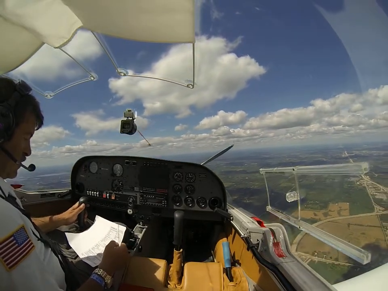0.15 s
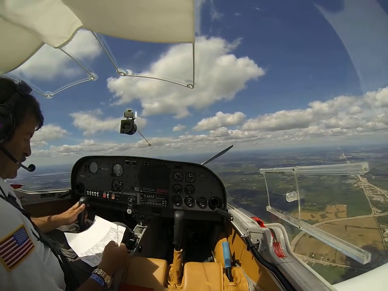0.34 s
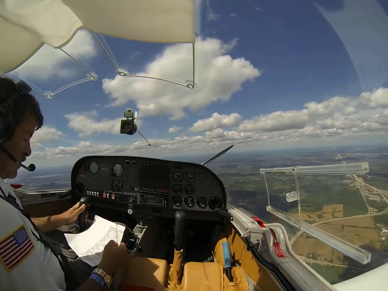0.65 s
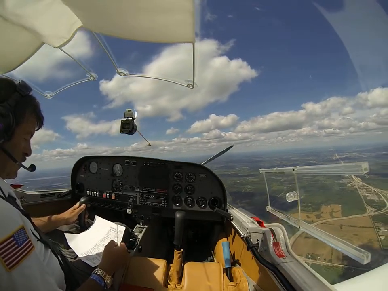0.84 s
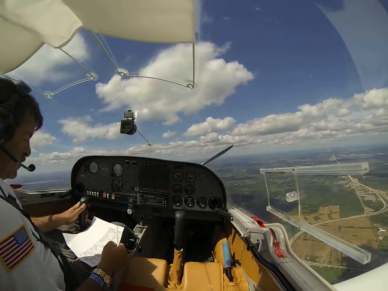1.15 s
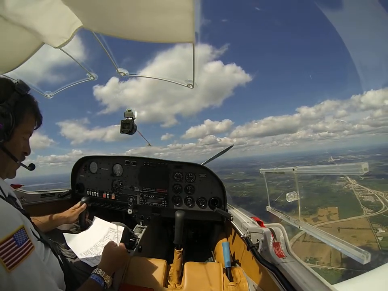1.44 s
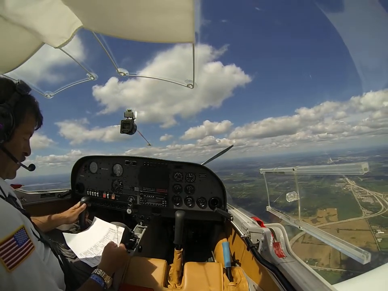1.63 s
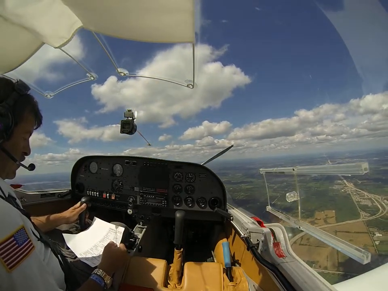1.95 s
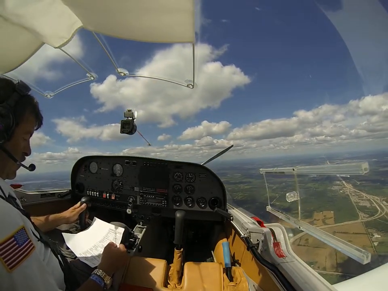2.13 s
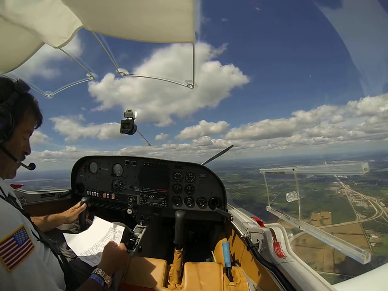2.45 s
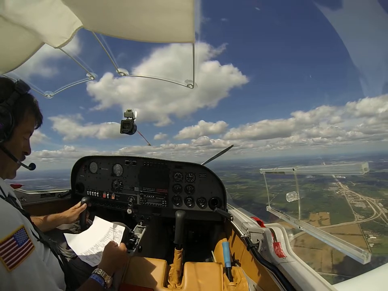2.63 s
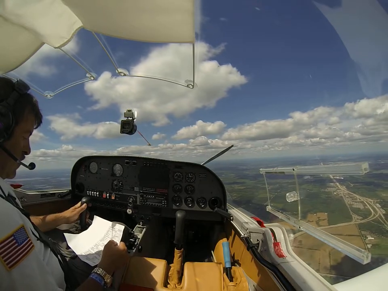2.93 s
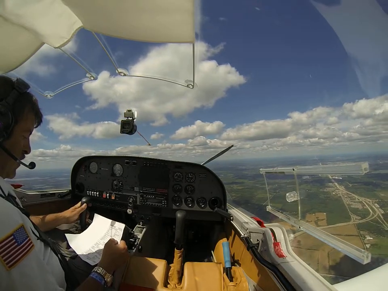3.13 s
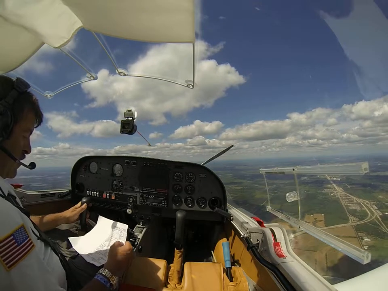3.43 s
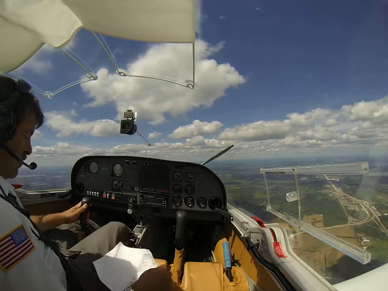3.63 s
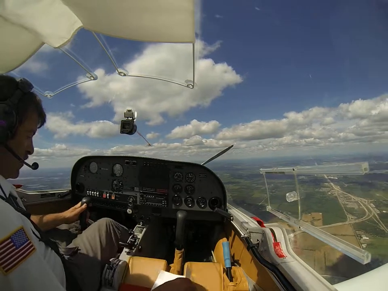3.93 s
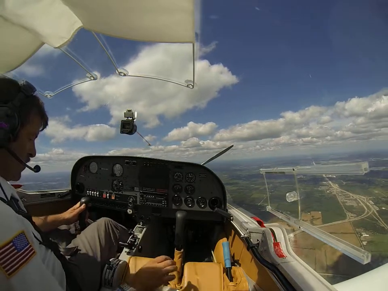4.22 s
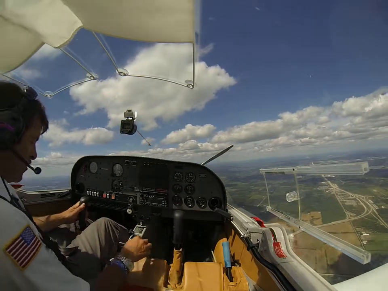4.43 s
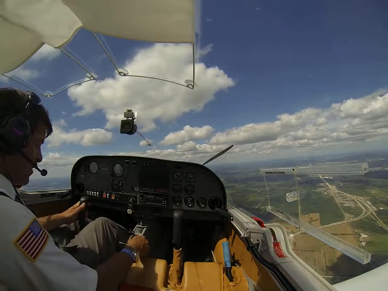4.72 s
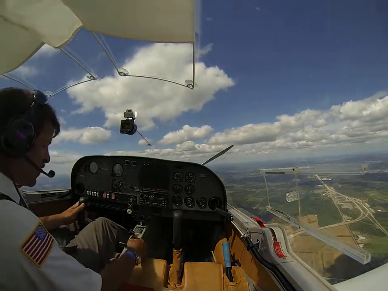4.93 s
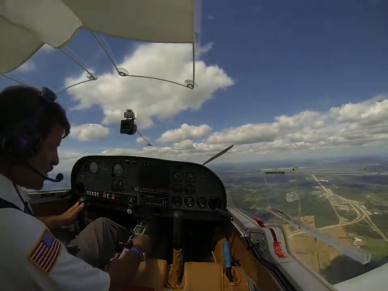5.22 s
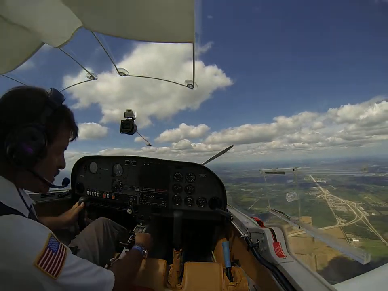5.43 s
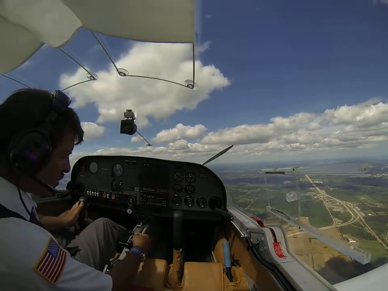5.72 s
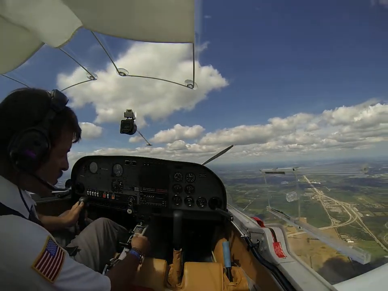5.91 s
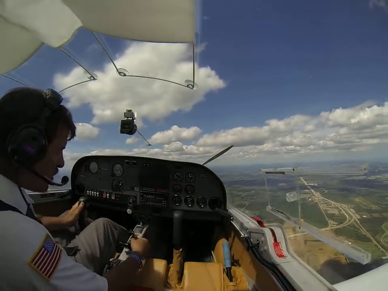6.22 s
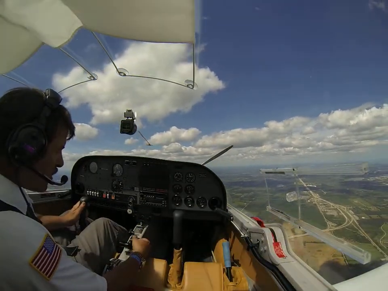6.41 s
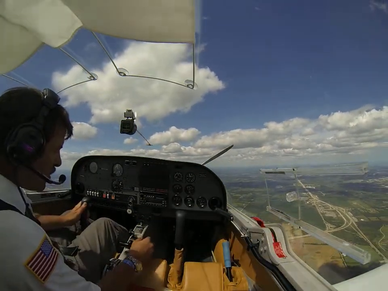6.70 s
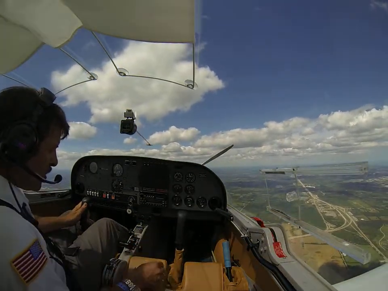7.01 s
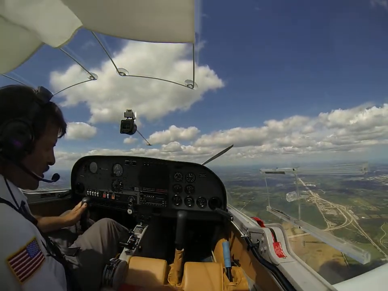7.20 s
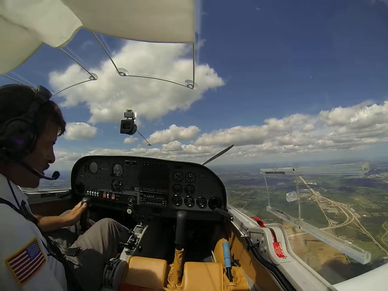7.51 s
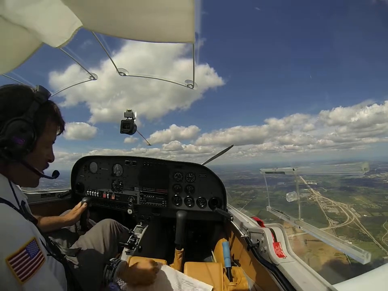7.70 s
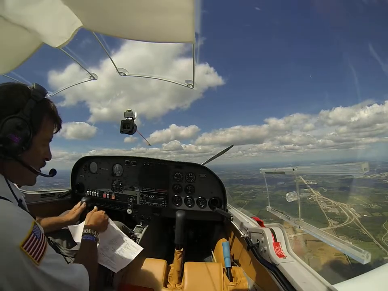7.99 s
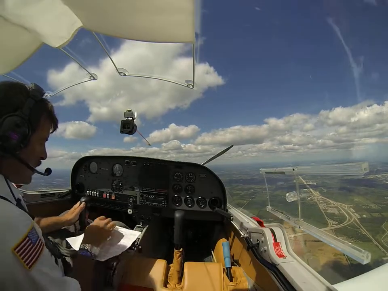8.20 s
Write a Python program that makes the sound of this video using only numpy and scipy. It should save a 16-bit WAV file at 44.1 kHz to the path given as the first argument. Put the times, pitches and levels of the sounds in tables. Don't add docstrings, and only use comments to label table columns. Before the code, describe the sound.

Dense low-frequency wind noise fills a light aircraft's cockpit from start to finish, booming in uneven pulses with a dull panel rumble. Thin air hiss from the seals and a barely-there high whistle lie beneath it. The flow is strongest for the first three seconds, then eases. A sheet of paper is brushed twice after four seconds and three times after seven. Everything is close, enclosed and muffled, with faint rapid electronic ticking from the camera itself.

```python
import sys
import numpy as np
from scipy import signal
from scipy.fft import rfft, irfft, next_fast_len
from scipy.io import wavfile
from scipy.ndimage import uniform_filter1d, map_coordinates

SR = 44100
rng = np.random.default_rng(int(sys.argv[2]) if len(sys.argv) > 2 else 0)


def master_out(mix):
    frames = np.transpose(np.atleast_2d(mix))
    ceiling = np.clip(frames, -1, 1)
    pcm = np.round(ceiling * 32767).astype(np.int16)
    wavfile.write(sys.argv[1], SR, pcm)


def boost_factor(decibels):
    exponent = np.asarray(decibels, float) / 20
    return 10 ** exponent


N = 368235


def shell():
    # centre in Hz, width in Hz, level in dB.
    bending_modes = [(22.2, 7.7, -0.5), (48, 23, -17)]
    hull_modes = [(76.1, 4, 1.5), (86.2, 8, -2)]
    cabin_modes = [(113, 9.7, -9.5), (137.3, 15.7, -2.5), (161.8, 17.2, 0), (183.4, 15, -8.5),
                   (217.4, 14, -10.5), (244.8, 19.3, -16)]
    panel_modes = [(267.8, 17, -4), (304.2, 19, 1.5), (333, 27, -2.5), (372.3, 28.5, -3), (400, 18, -6),
                   (430.6, 25, -8), (463, 31, -13.5), (558, 46, -18.5)]
    # time in seconds, swell in dB.
    throbs = [(.02, 9), (.21, -9), (.5, 8), (.69, 8), (.83, 3), (1.03, 4.5), (1.19, -5), (1.66, -8),
              (2.34, 1), (2.62, 7), (2.72, 8), (3.22, -4), (3.42, 5.5), (3.76, -5), (3.97, 4.5), (4.14, 3),
              (4.36, 9.5), (4.68, -14), (4.96, 5), (5.25, 6.5), (5.42, 3), (5.76, 9), (5.84, -8), (6.25, 8),
              (6.6, 3), (6.93, -10), (7.23, -3), (7.37, 7), (7.64, 6), (8.11, -10)]
    # time in seconds, swell in dB.
    buffets = [(.02, 0.5), (.27, -1.5), (.49, 2.5), (.64, -6), (.73, 1.5), (.91, 5.5), (1.19, -1.5),
               (1.67, 4), (1.85, 2.5), (2.35, 3.5), (2.54, 4), (2.77, -2.5), (2.86, 4), (2.95, -4.5),
               (3.06, 4.5), (3.2, -6), (3.99, -6.5), (4.26, -0.5), (4.67, 4.5), (5.38, 3), (5.46, 3.5),
               (5.61, 5), (6.07, -2), (6.25, 4.5), (6.41, 2), (7.05, 2), (7.52, 0), (7.61, 4.5),
               (7.74, -5.5), (7.94, -4.5)]
    # time in seconds, swell in dB.
    shakes = [(.02, 5), (.15, -3.5), (.78, 2.5), (1.1, 5.5), (1.29, 4), (1.67, 2.5), (1.8, 2), (2.28, 3.5),
              (2.6, 0), (3.06, 2.5), (3.15, -4.5), (3.24, 4), (3.39, 3), (3.66, -3), (5.21, 3),
              (5.42, -5.5), (5.65, 2.5), (5.71, -5), (6.26, -2), (6.7, 4), (7.2, 0), (8.05, 2.5)]
    throb_s, buffet_s = 0.044, 0.033

    sway_db = follows(mean_db=-40, gain_per_db=0.3, unsteady_db=1.4, rate=8)
    hull_db = follows(mean_db=-38, gain_per_db=0.25, unsteady_db=0.92, rate=12) + swells(throbs, throb_s)
    boom_db = follows(mean_db=-28.5, gain_per_db=0.86, unsteady_db=0.68, rate=14) + swells(buffets, buffet_s)
    panel_db = follows(mean_db=-37, gain_per_db=0.51, unsteady_db=0.63, rate=14) + swells(shakes, buffet_s)

    sway = boost_factor(sway_db) * held(noise(ringing(bending_modes, steep=1.38)), span_s=0.25)
    hull = boost_factor(hull_db) * held(noise(ringing(hull_modes, steep=1.35)), span_s=0.091)
    boom = boost_factor(boom_db) * held(noise(ringing(cabin_modes, steep=1.66)), span_s=0.1)
    panels = boost_factor(panel_db) * held(noise(ringing(panel_modes, steep=1.43)), span_s=0.28)
    return sway + hull + boom + panels


def hiss():
    # centre in Hz, width in Hz, level in dB.
    housing_modes = [(806, 160, -14), (943, 65, -5.5), (1325, 225, -9), (1486.5, 87, 0), (1667, 110, -4.5),
                     (1860, 150, -11.5)]
    seal_modes = [(2281, 167, 1.5), (2570, 630, -11.5), (3116, 100, -6), (3174, 540, -9),
                  (3800, 370, -17.5), (4790, 130, -15.5), (5170, 220, -13.5)]
    # frequency in Hz, density in dB per Hz.
    fizz_spectrum = [(3600, -27), (4100, -2), (4500, -5), (6000, 1), (7700, -1.5), (8500, -6), (9550, -6.5),
                     (9750, -9.5)]
    # frequency in Hz, gain in dB.
    capsule_loss = [(9750, 0), (12000, -2), (13400, -4), (14000, -4.5), (14400, -9), (15000, -10),
                    (15300, -40)]

    def fizz_gain(f):
        return boost_factor(along(fizz_spectrum, f) + along(capsule_loss, f)) * (f > fizz_spectrum[0][0])

    gust = wobble(9) + 0.5 * wobble(30)
    housing_db = follows(mean_db=-50.5, gain_per_db=0.24, unsteady_db=0.1, rate=3) + 0.19 * gust
    seal_db = follows(mean_db=-58.5, gain_per_db=0.3, unsteady_db=0.1, rate=3) + 0.15 * gust
    fizz_db = follows(mean_db=-68, gain_per_db=0.25, unsteady_db=0.1, rate=3) + 0.35 * gust

    housing = boost_factor(housing_db) * noise(ringing(housing_modes, steep=1.236), patchy_db=0.8)
    seal = boost_factor(seal_db) * noise(ringing(seal_modes, steep=1.47), patchy_db=0.9)
    fizz = boost_factor(fizz_db) * noise(fizz_gain, patchy_db=1.0)
    return housing + seal + fizz


def whistle():
    # time in seconds, pitch in Hz.
    gap_pitch = [(0, 6800), (.9, 6830), (1.05, 6960), (1.6, 6870), (2.15, 6970), (2.3, 6900), (2.95, 6790),
                 (3.7, 6710), (4.15, 6780), (4.35, 6980), (4.9, 6750), (5.5, 6740), (5.8, 6580),
                 (6.2, 6730), (6.65, 7130), (6.95, 6780), (8, 6770), (8.35, 6640)]
    # time in seconds, swell in dB, half-length in seconds.
    locks = [(.3, 4, .3), (1.1, 9, .2), (1.4, 4, .2), (1.8, 6, .15), (2.12, 9, .1), (2.75, 3, .25),
             (3.5, 4, .12), (4.05, 6, .2), (4.5, 5, .2), (5.25, 6.5, .25), (5.95, 7.5, .12), (6.4, 1, .1),
             (6.66, 8, .1), (7.14, 8, .12), (8.2, 6, .15)]
    # centre in Hz, width in Hz, level in dB.
    slot_modes = [(6600, 60, -6.5), (6790, 60, -3.5), (6960, 50, -3), (7160, 80, -4), (7200, 80, -4),
                  (6900, 900, -10.5)]

    pitch_hz, = curves(gap_pitch)
    phase = 2 * np.pi * np.cumsum(pitch_hz + 40 * wobble(14)) / SR
    breath = [noise(lambda f: 1 / (1 + (f / 200) ** 2)) for _ in range(2)]
    eddies = breath[0] * np.cos(phase) + breath[1] * np.sin(phase)
    level_db = -79 + swells(locks) + 2.1 * wobble(24)
    return boost_factor(level_db) * coloured(eddies, ringing(slot_modes, steep=1.2))


def paper():
    # time in seconds, peak in dB, length in seconds.
    brushes = [
        (4.243, -55, 0.04),
        (4.307, -50, 0.029),
        (7.192, -40, 0.041),
        (7.789, -55, 0.037),
        (7.944, -55, 0.037),
    ]
    # centre in Hz, width in Hz, level in dB.
    sheet_modes = [(2280, 220, 0), (3250, 300, 0)]
    crackle_modes = [(4550, 1500, 0), (6100, 900, -2)]

    t = np.arange(N) / SR
    swell = np.zeros(N)
    snap = np.zeros(N)
    for start_s, peak_db, length_s in brushes:
        u = np.clip(t - start_s + 0.0034, 0, None)
        rise = boost_factor(peak_db - 11) * (1 - np.exp(-u / 0.006))
        swell += rise * np.exp(-(u / max(length_s, 0.005)) ** 4)
        snap += rise * np.exp(-u / 0.028)
    body = swell * boost_factor(1.6 * wobble(230)) * noise(ringing(sheet_modes, steep=1.04))
    crackle = snap * boost_factor(-8 + 4.0 * wobble(280)) * noise(ringing(crackle_modes, steep=1.5))
    return body + crackle


def circuits():
    burst_hz, first_s, tone_hz = 47.9710, 0.0059, 6444
    t = np.arange(N) / SR - first_s
    k = np.floor(t * burst_hz + 0.3).astype(int)
    count = k.max() + 2
    late_cycles = 0.22 * (np.arange(count) % 2) + 0.085 * rng.standard_normal(count)
    u = t - k / burst_hz - late_cycles[k] / tone_hz
    gate = np.clip(np.minimum(u, 0.0082 - u) / 0.0004, 0, 1)
    tone = boost_factor(-69) * np.sin(2 * np.pi * tone_hz * u)
    octave = boost_factor(-74.5) * np.sin(4 * np.pi * tone_hz * u)
    return gate * (tone + octave)


def follows(mean_db, gain_per_db, unsteady_db, rate):
    # time in seconds, strength in dB about its mean.
    airstream = [(0, 3), (.5, 2), (1, 3), (1.5, 1.5), (2.2, 2.5), (2.8, 1.5), (3.2, -2), (3.7, -2),
                 (4.3, 0), (4.8, -1), (5.4, -1.5), (6, -1.5), (6.5, 0), (7, 0), (7.6, 0), (8.35, -.5)]
    return mean_db + gain_per_db * curves(airstream)[0] + unsteady_db * wobble(rate)


def swells(rows, half_s=None):
    t = np.arange(0, N + 64, 64) / SR
    total = np.zeros(len(t))
    for row in rows:
        total += row[1] * np.exp(-((t - row[0]) / max(half_s or row[2], 0.01)) ** 2)
    return np.interp(np.arange(N) / SR, t, total)


def ringing(modes, steep):
    def resonance(f, centre, width):
        return (1 + ((f * f - centre * centre) / (f * width + 1e-9)) ** 2) ** -steep

    def gain(f):
        power = sum(boost_factor(2 * db) * resonance(f, centre, width) for centre, width, db in modes)
        return np.sqrt(power / (1 + (f / 8000) ** 6))

    return gain


def noise(gain, patchy_db=0.):
    z = signal.stft(rng.standard_normal(N + SR), nperseg=512)[2]
    field = uniform_filter1d(rng.standard_normal(z.shape), size=5, axis=0)
    field = uniform_filter1d(field, size=8, axis=1)
    patchy = signal.istft(z * boost_factor(patchy_db * unit(field)), nperseg=512)[1]
    return coloured(patchy, gain)


def held(x, span_s):
    power = uniform_filter1d(x ** 2, int(span_s * SR))
    power = uniform_filter1d(power, int(span_s * SR / 2))
    return unit(x / (np.sqrt(np.abs(power)) + 0.095))


def coloured(x, gain):
    m = next_fast_len(len(x))
    spectrum = rfft(x, m) * gain(np.fft.rfftfreq(m, 1 / SR))
    return unit(irfft(spectrum, m)[:N])


def wobble(rate):
    knots = rng.standard_normal(int(N * rate / SR) + 4)
    return map_coordinates(knots, [np.arange(N) * rate / SR])


def along(points, f):
    hz, db = np.transpose(points)
    return np.interp(np.log(f + 1), np.log(hz), db)


def curves(rows):
    s, *columns = np.transpose(rows)
    return [np.interp(np.arange(N) / SR, s, column) for column in columns]


def unit(x):
    return x / np.sqrt(np.mean(x ** 2) + 1e-20)


def scene():
    return (shell() + hiss() + whistle() + paper())[None]


def low_pass(x):
    return signal.sosfilt(signal.butter(12, 15010, fs=SR, output="sos"), x)


def record(dry):
    return low_pass(dry + circuits())


dry = scene()
out = record(dry)
master_out(out)
```